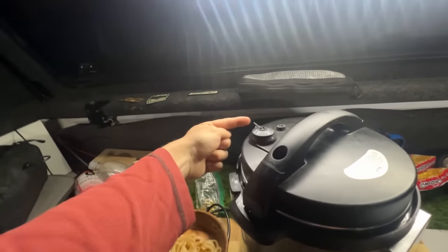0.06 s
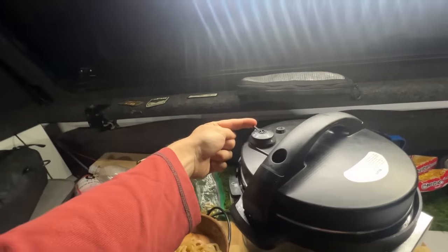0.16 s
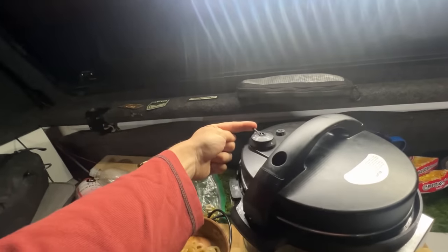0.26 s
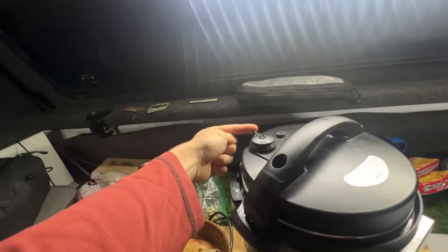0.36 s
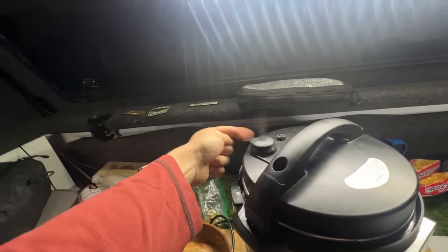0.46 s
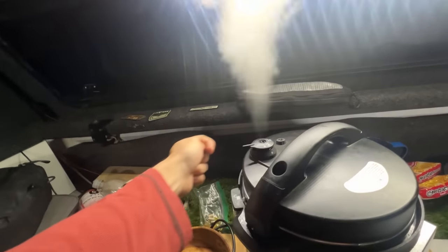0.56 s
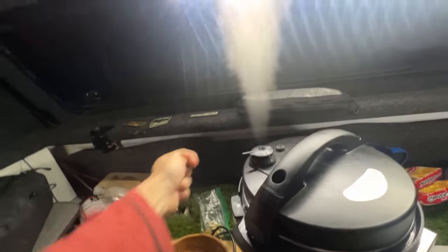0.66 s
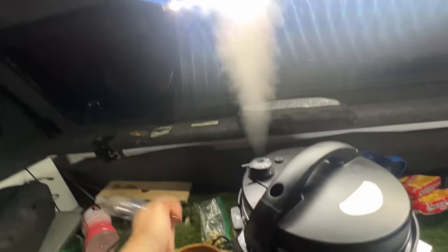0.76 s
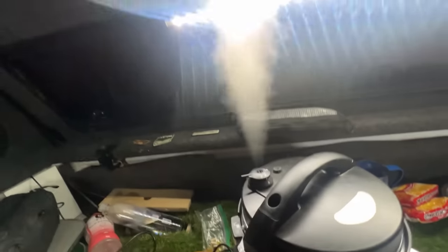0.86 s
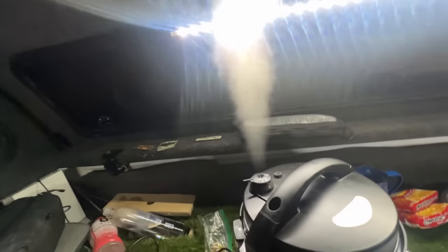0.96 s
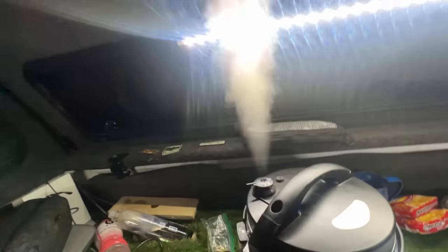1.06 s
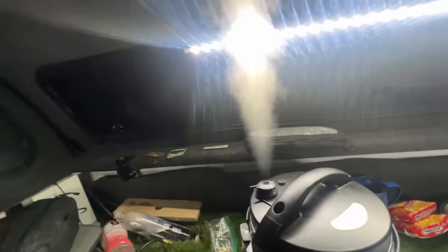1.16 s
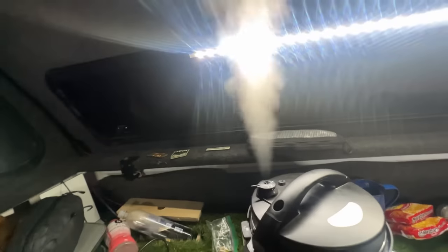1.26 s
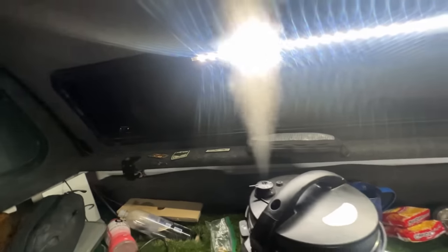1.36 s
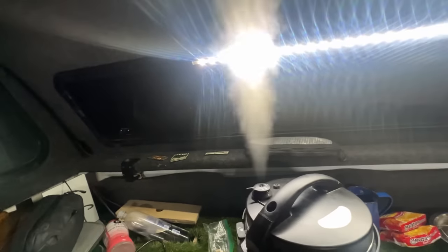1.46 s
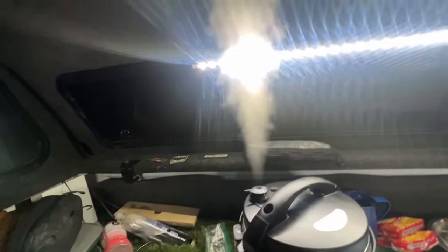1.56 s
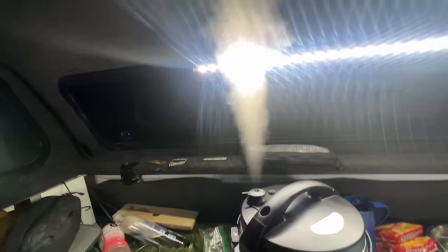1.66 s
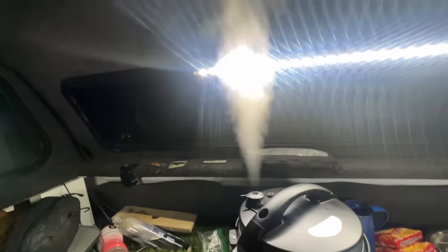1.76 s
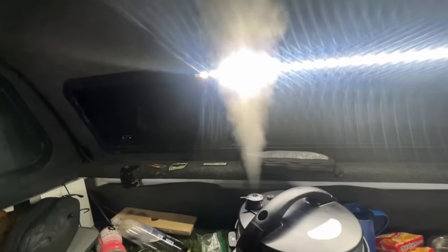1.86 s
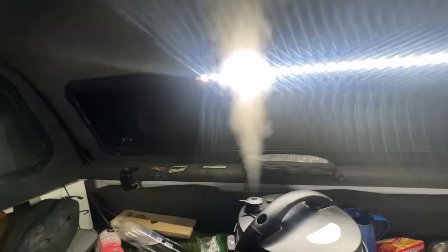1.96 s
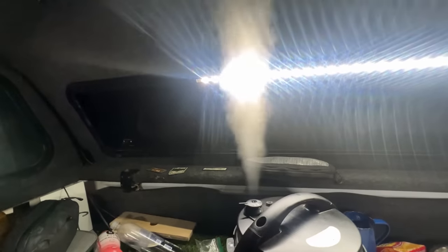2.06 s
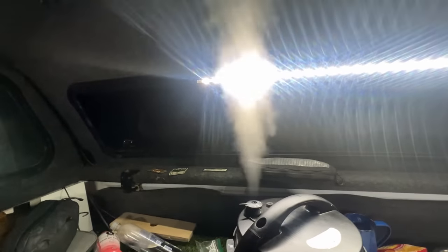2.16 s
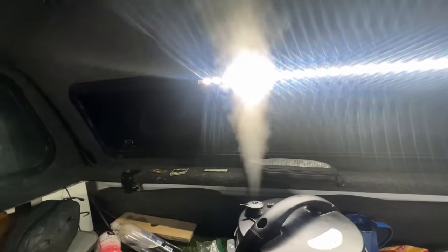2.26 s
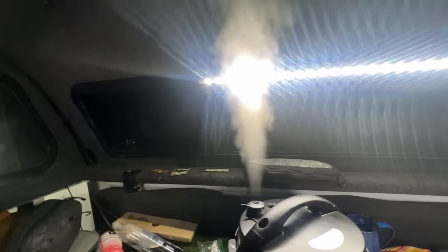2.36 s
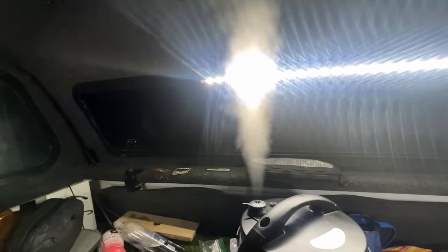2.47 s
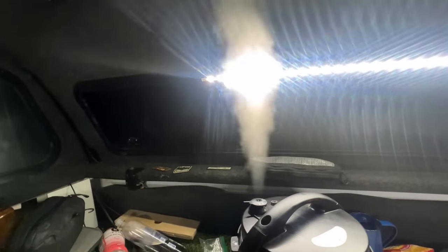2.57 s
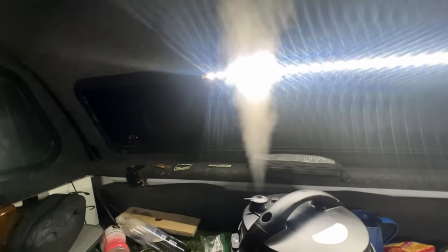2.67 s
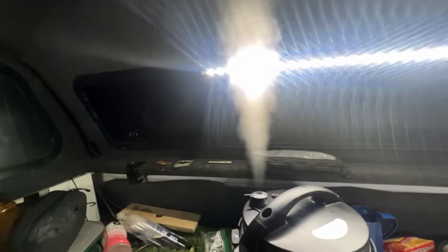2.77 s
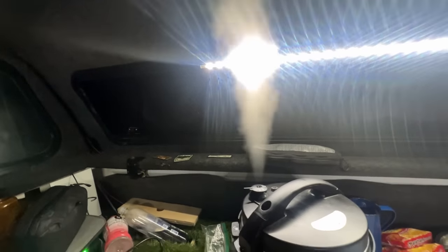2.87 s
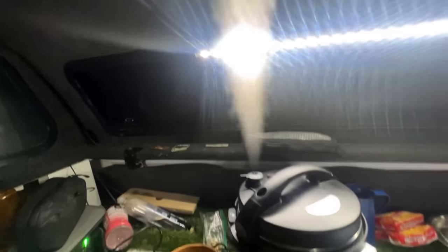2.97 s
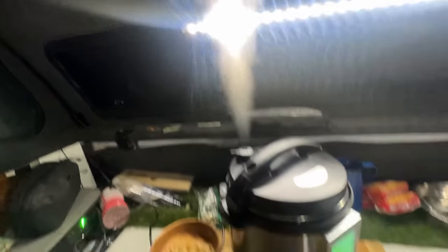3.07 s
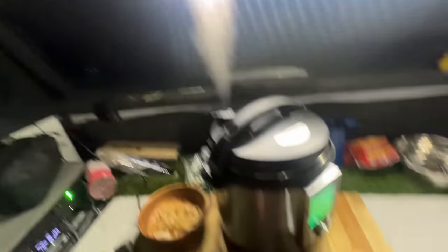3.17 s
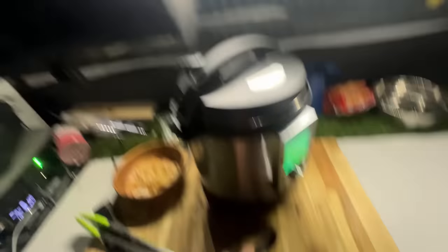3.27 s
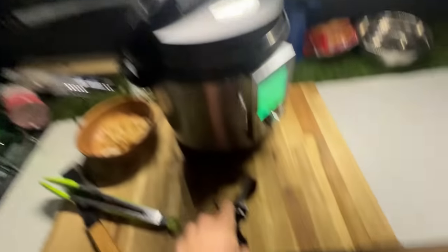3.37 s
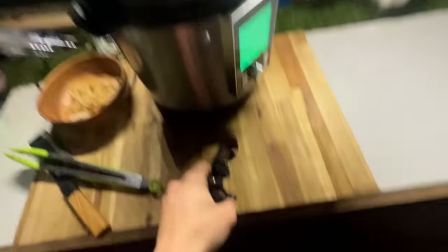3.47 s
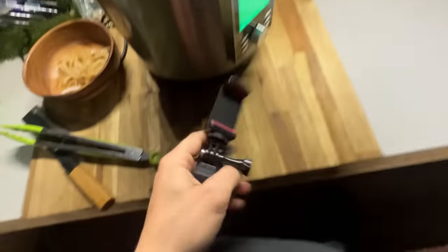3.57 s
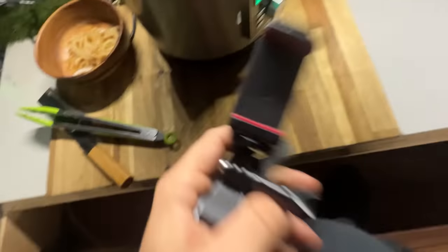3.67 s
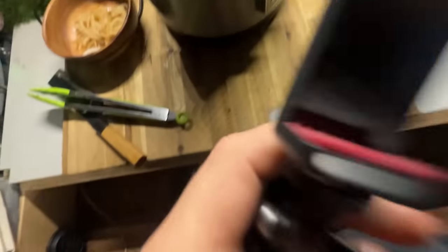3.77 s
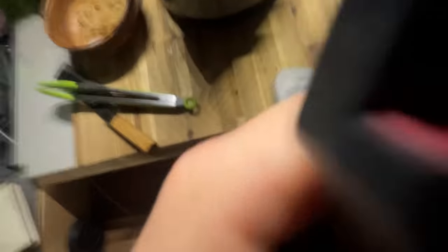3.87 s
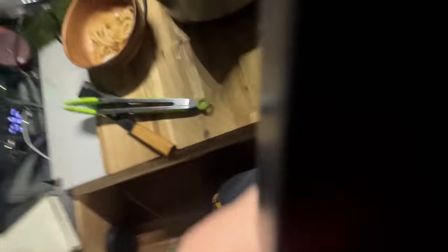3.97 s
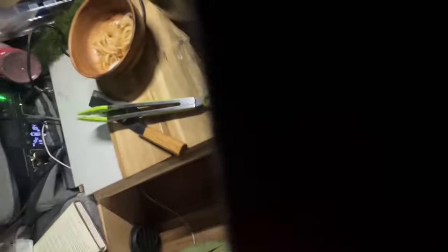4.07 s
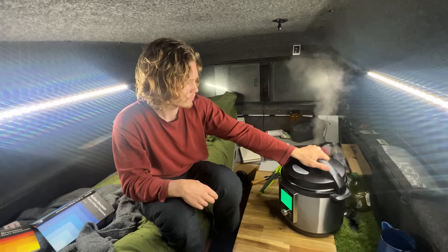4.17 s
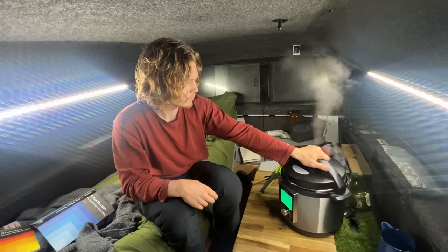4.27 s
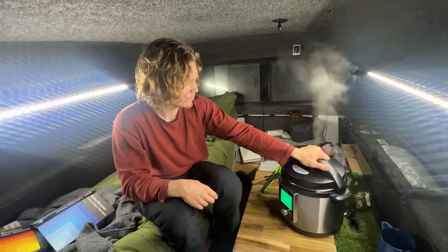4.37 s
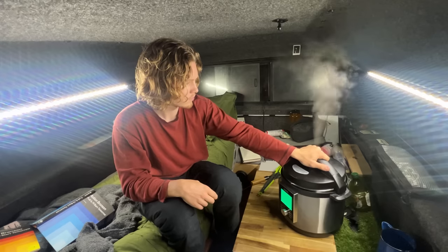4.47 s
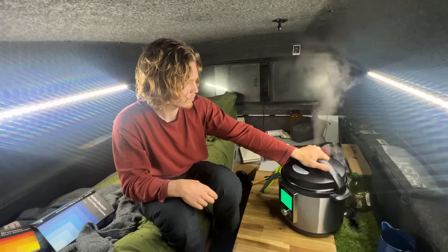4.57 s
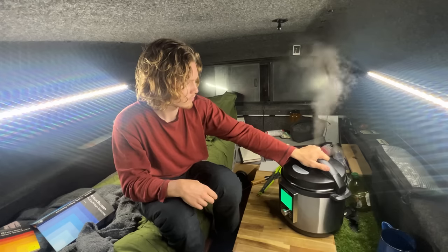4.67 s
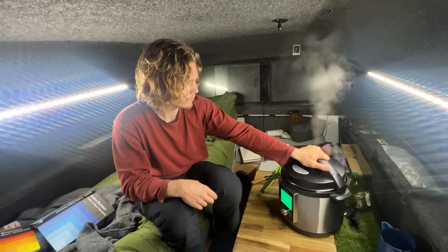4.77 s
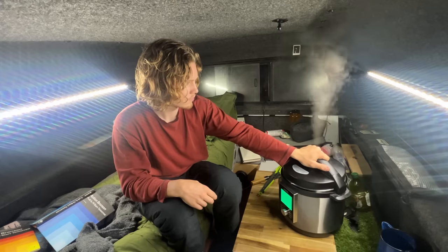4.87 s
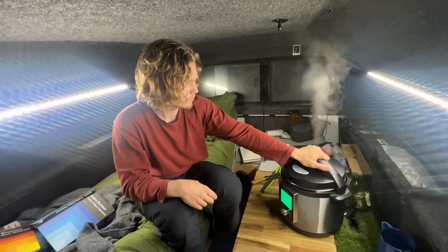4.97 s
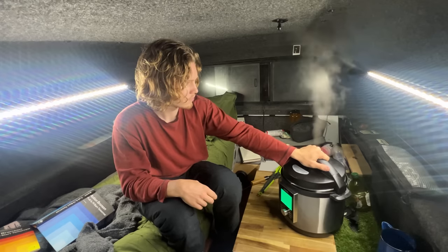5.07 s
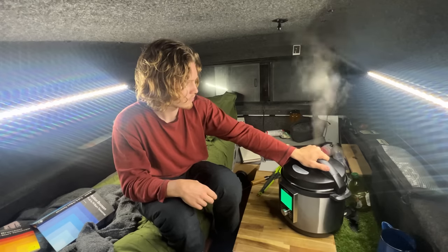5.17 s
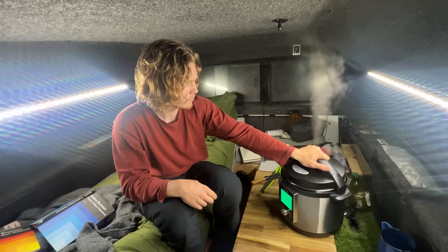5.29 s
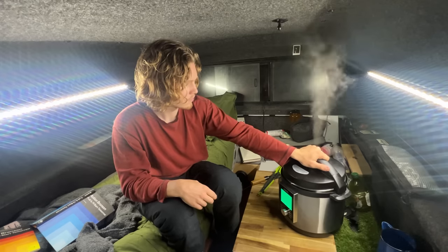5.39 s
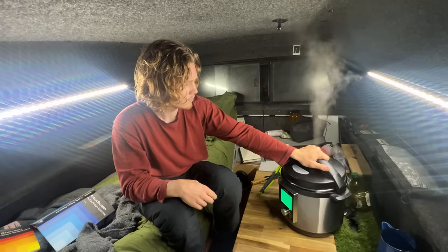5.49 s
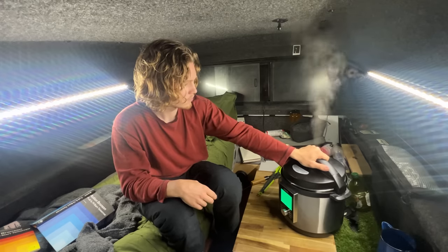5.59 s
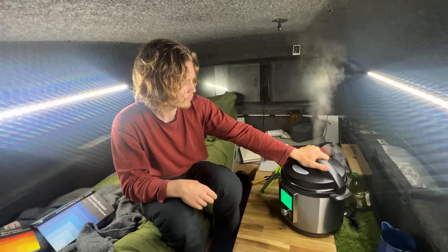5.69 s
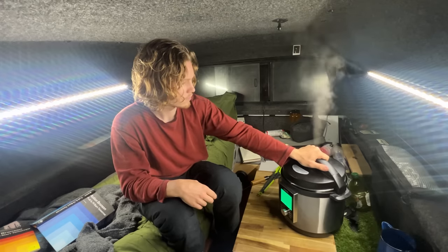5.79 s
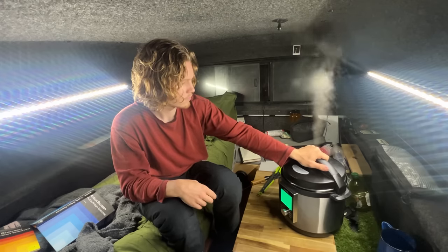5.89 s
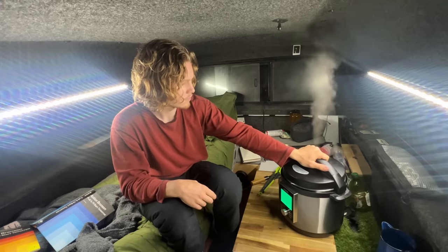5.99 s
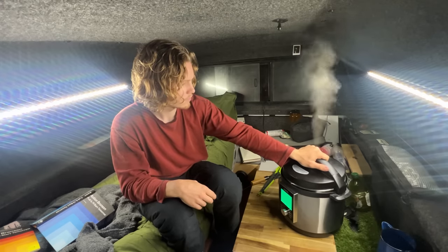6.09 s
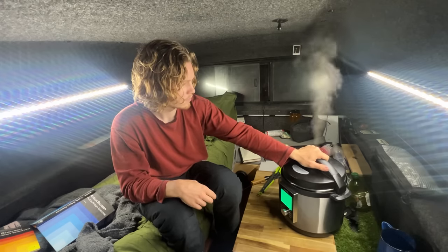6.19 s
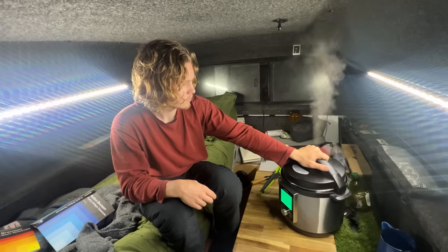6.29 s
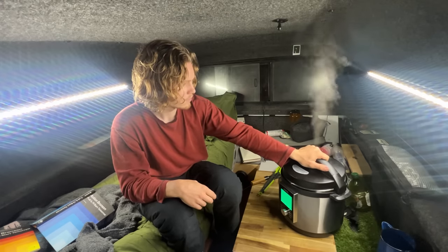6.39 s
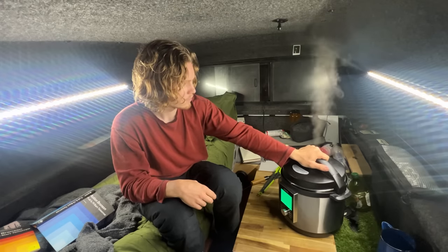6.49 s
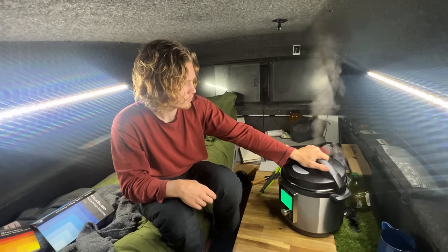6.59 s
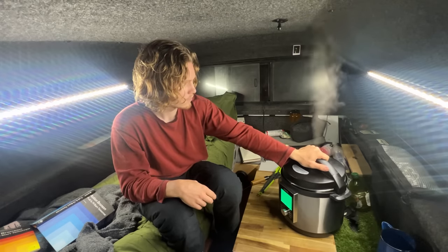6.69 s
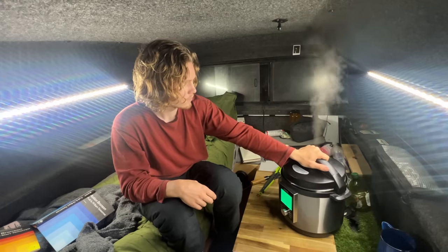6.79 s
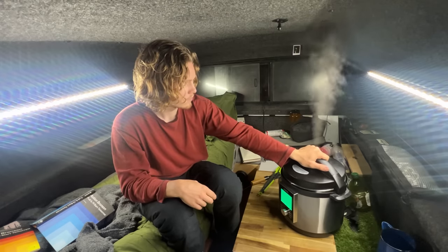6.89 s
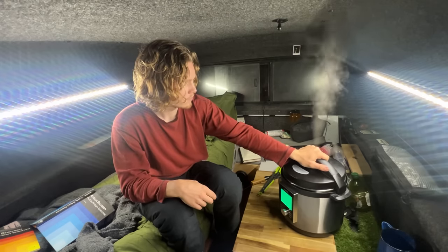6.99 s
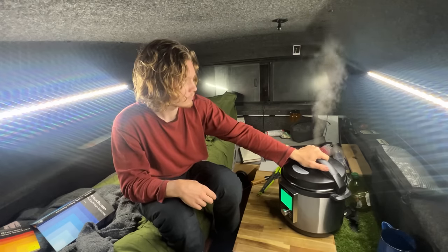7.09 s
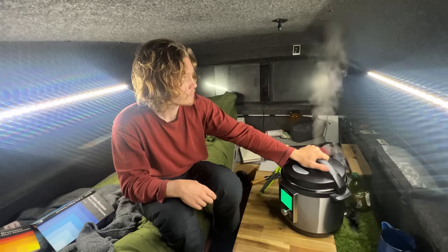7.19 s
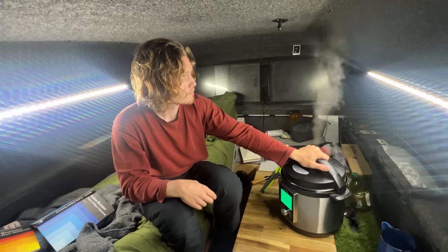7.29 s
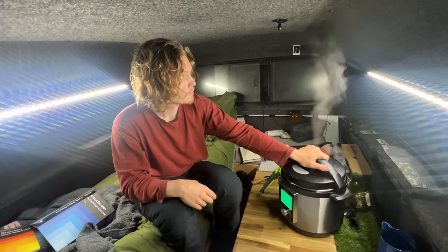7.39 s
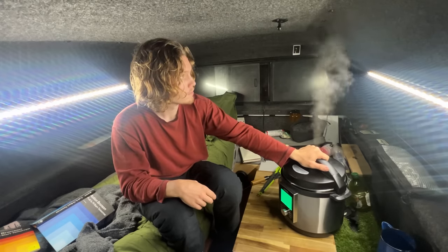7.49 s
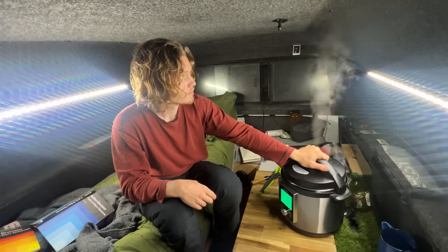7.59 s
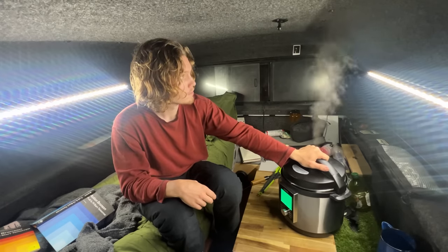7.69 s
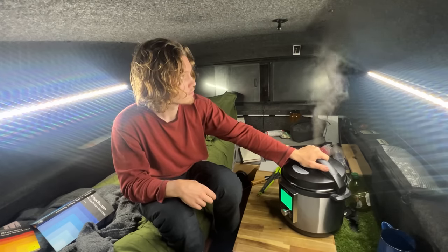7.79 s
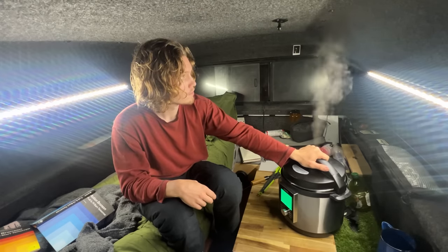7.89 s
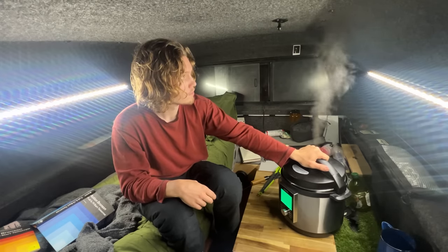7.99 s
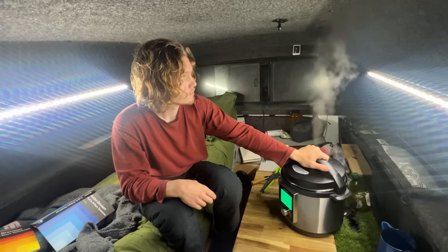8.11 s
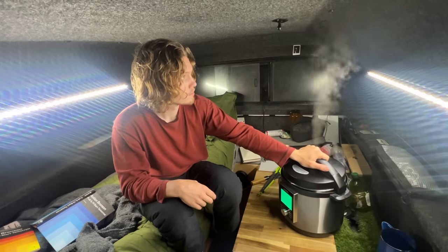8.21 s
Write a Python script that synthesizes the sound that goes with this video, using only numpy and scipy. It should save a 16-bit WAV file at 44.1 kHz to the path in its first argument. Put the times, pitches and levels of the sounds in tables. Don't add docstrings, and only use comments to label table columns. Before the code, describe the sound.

A low hum in a small camper, then a valve knocks open and steam blasts out in a loud close hiss, later clicking away to a distance.

```python
import sys
import numpy as np
from scipy import signal
from scipy.fft import rfft, irfft, next_fast_len
from scipy.io import wavfile
from scipy.ndimage import map_coordinates

SR = 44100
rng = np.random.default_rng(int(sys.argv[2]) if len(sys.argv) > 2 else 0)


def field_ratio(decibels):
    return 10 ** (np.asarray(decibels, dtype=float) / 20)


def wav_out(sig):
    wavfile.write(sys.argv[1], SR, np.round(np.clip(np.atleast_2d(sig).T, -1, 1) * 32767).astype(np.int16))


N = 363825

# (time [s], share of the far colour [0-1],
# first frequency where the ports cancel [Hz, sign: which port leads], unshared part of the valley [0-1])
POSITIONS = [(.46, 0, -3600, .5), (.68, 0, -3600, .33), (.95, 0, -3800, .6), (1.12, 0, -4100, .7),
             (1.3, 0, -3700, .8), (2.85, 0, -3950, .5), (3.13, .15, -3750, .4), (3.24, .4, -3200, .02),
             (3.335, .5, -2700, .02), (3.44, .55, -2100, .7), (3.58, .5, -2300, .9), (3.72, .6, -2500, .9),
             (3.9, .7, 2300, .9), (4.15, .75, 2300, .9), (4.4, .85, 2200, .9), (4.62, 1, 2300, .75)]


def unit(x):
    return x / np.sqrt(np.mean(x ** 2) + 1e-20)


def along(points, hz):
    f, *cols = np.transpose(points)
    return np.array([np.interp(np.log(hz + 1), np.log(f + 1), c) for c in cols])


def curves(rows):
    s, *cols = np.transpose(rows)
    return np.array([np.interp(np.arange(N) / SR, s, c) for c in cols])


def wobble(rate):
    knots = rng.standard_normal(int(N * rate / SR) + 4)
    return map_coordinates(knots, [np.arange(N) * rate / SR])


def noise(gain, alike, size=N):
    m = next_fast_len(size)
    spectra = rfft(rng.standard_normal((2, m))) * gain(np.fft.rfftfreq(m, 1 / SR))
    mid, side = irfft(spectra, m)[:, :size]
    turn = np.arccos(np.clip(alike, -1, 1)) / 2
    return unit(np.cos(turn) * mid + np.sin(turn) * side * np.array([[1], [-1]]))


def peak(hz, centre_hz, width_hz):
    return 1j * hz * width_hz / (centre_hz ** 2 - hz ** 2 + 1j * hz * width_hz)


def hum():
    # (frequency [Hz], density [dB per Hz])
    rumble_colour = [(12, -56), (20, -19), (43, -23), (81, 0), (150, -1.5), (200, -58), (330, -120)]
    # (frequency [Hz], density [dB per Hz])
    air_colour = [(120, -16), (200, -1.5), (243, -22.5), (286, -6.5), (345, -13.5), (377, -17), (464, -17),
                  (545, -29), (754, -27.5), (812, -25.5), (1000, -24.5), (1300, -48), (2200, -120)]
    # (frequency [Hz], density [dB per Hz])
    quiet_colour = [(500, 3), (900, -9), (1180, -5), (1265, 2.5), (1360, -7), (1900, -4), (2400, -16),
                    (3700, -22), (6800, -21), (7550, -11.5), (8200, -22), (9800, -30), (11000, -64),
                    (14000, -120)]
    # (time [s], gain [dB])
    gain_points = [(0, -9.5), (.5, -6.5), (1.3, -10), (1.75, -17), (2.15, -26), (2.6, -19), (3.06, -16),
                   (3.3, -29), (3.7, -24.5), (3.92, -5), (4.5, 0), (8.25, 0)]
    gain_db, = curves(gain_points)
    rumble = noise(lambda hz: field_ratio(along(rumble_colour, hz)), alike=0.98)
    tone = noise(lambda hz: peak(hz, 174.2, 12.7) * peak(hz, 168.0, 92), alike=0.9)
    air = noise(lambda hz: field_ratio(along(air_colour, hz)), alike=0.63)
    quiet = noise(lambda hz: field_ratio(along(quiet_colour, hz)), alike=0.022)
    out = field_ratio(-39 + 1.41 * gain_db) * rumble
    out += field_ratio(-40.5 + 0.77 * gain_db) * tone
    out += field_ratio(-45.5 + 0.82 * gain_db) * air
    out += field_ratio(-72.5 + 16.5 + 0.35 * gain_db) * quiet
    return out


def finger_rubs():
    # (start [s], end [s], level [dB], centre [Hz], fade [dB])
    scrapes = [
        (.234, .3, -68, 2800, 10),
        (.43, .456, -47, 900, -4),
        (.452, .55, -24.5, 950, 22),
    ]
    # (start [s], end [s], level [dB], centre [Hz], fade [dB])
    grips = [
        (3.09, 3.28, -62, 80, 0),
        (3.1, 3.25, -62, 330, 0),
        (4.03, 4.075, -50, 520, -3),
        (.455, .53, -42, 230, 8),
        (3.08, 3.22, -60, 750, 0),
        (3.27, 3.31, -60, 300, 0),
        (3.972, 4.064, -41.5, 1350, -2),
        (3.97, 4.0, -46, 480, 6),
        (4.3, 4.36, -39, 250, 4),
        (4.45, 4.49, -51, 560, 4),
    ]
    out, t = np.zeros((2, N + SR)), np.arange(SR // 5) / SR
    for rows, wide in ((scrapes, 0.84), (grips, 0.5)):
        for s, end, db, centre_hz, fade_db in rows:
            stroke = np.clip(np.minimum(t / .003, (end - s - t) / .008), 0, 1)
            stroke = stroke * field_ratio(db - fade_db * t / (end - s))
            rub = noise(lambda hz: peak(hz, centre_hz, wide * centre_hz) ** 2, alike=0.21, size=len(t))
            flutter = field_ratio(5.1 * wobble(237)[:len(t)])
            out[:, round(s * SR):][:, :len(t)] += stroke * rub * flutter
    return out[:, :N]


def jet_levels():
    # (time [s], main hiss [dB], left-right difference [dB])
    flow = [(.47, -21, 3), (.84, -22, .5), (1.25, -24, 1), (2.13, -27, 5), (3.0, -27.5, 2), (3.2, -26.5, 9),
            (3.34, -27, 5), (3.44, -27.5, 7.5), (3.6, -26.5, 9.5), (3.87, -27, 5.5), (3.89, -30.5, 7),
            (3.95, -34, 11), (4.07, -37, 10), (4.2, -33.5, 14), (4.35, -35, 12), (4.66, -39, 17),
            (6.4, -41, 16.5), (8.25, -43.5, 17.5)]
    main_db, pan_db = curves(flow)
    far, = curves([position[:2] for position in POSITIONS])
    burst_db = 4.5 * np.exp(-np.abs(np.arange(N) / SR - POSITIONS[0][0]) / 0.29)
    roar_db = -15.5 + burst_db + 1 * far
    valley_db = -19.5 + burst_db
    top_db = -11 - 6 * np.clip(far / 0.65, 0, 1)
    return [main_db + db for db in (roar_db, valley_db, 0, top_db)], pan_db


def walls(hz, size, left_echoes, alike, tail_db, t60):
    drawn = rng.uniform([1.3, -25], [8, -17], (2, 14, 2))
    ports = [drawn[0] if left_echoes is None else left_echoes, drawn[1]]
    echoes = np.array([sum(field_ratio(db) * np.exp(-2j * np.pi * hz * ms / 1000) for ms, db in port)
                       for port in ports])
    t = np.arange(SR // 8) / SR
    tail = rng.standard_normal((2, len(t))) * field_ratio(-60 * t / t60) * (t > .005)
    echoes += field_ratio(tail_db) * rfft(tail / np.linalg.norm(tail[0]), size)
    echoes[1] += alike / (1 + (hz / 4500) ** 8) * (echoes[0] - echoes[1])
    fade = 1 / (1 + (hz / 9800) ** 30)
    hardness_db = 2
    return np.exp(field_ratio(hardness_db) * fade * echoes)


def jet_colour(hz, far):
    # (frequency [Hz], left [dB], right [dB])
    close_colour = [(520, -24.5, -32.5), (1057, -14.5, -16), (1530, -13, -9), (2030, -11, -10.5),
                    (3240, -12, -12), (3700, -11.5, -10.5), (5440, -5.5, -12), (5640, -4.5, -11),
                    (8140, -3, -4.5), (8690, -6.5, 0), (9100, -5.5, -10), (10400, -3.5, -0.5),
                    (12200, -8, -10.5), (15500, -9.5, -8)]
    # (frequency [Hz], left [dB], right [dB])
    far_colour = [(500, -24, -26), (1000, -17, -21), (1430, -17, -24), (2100, -23, -27), (3900, -23, -30),
                  (5300, -10, -20), (6000, -1, -19), (7000, -3, -20), (7900, -8.5, -21), (8500, -18, -22),
                  (9300, -23, -22), (10300, -27.5, -27.5), (11000, -33, -33), (12900, -20, -20),
                  (13600, -20, -20), (14300, -45, -45), (15000, -41, -41)]
    share = np.where((hz > 4300) & (hz < 9600), far, far ** 6)
    return field_ratio((1.5 - share) * along(close_colour, hz) + share * along(far_colour, hz))


def jet_at_ports(hz, size, far, cancel_hz, unshared, on_stand):
    # (frequency [Hz], width [Hz], level [dB], sign and size at the right port)
    held_modes = [(1424, 560, -1.5, 0.16), (1566, 56, 17.5, -0.42), (1684, 174, 4.5, 0.38),
                  (1982, 26, 10.5, -0.47), (2373, 42, -2, 0.73)]
    # (frequency [Hz], width [Hz], level [dB], sign and size at the right port)
    stand_modes = [(758, 86, 4.4, 0.49), (1068, 99, 1.8, 0.11), (1428, 220, 5.4, 0.11),
                   (1664, 86, 0.67, 0.29), (5340, 7.7, 1.2, 0.74)]
    together_hz = 12050 + far ** 5 * (12150 - 12050)
    turn_hz = 3450 + far ** 5 * (3350 - 3450)
    top = 2 * np.pi * (hz - together_hz) / turn_hz
    top -= (.2 + .2 * far) * np.sin(2 * top)
    low = np.pi * hz / cancel_hz
    low -= .85 * np.sin(low)
    apart = np.where(hz < 9600, low, top)
    common, *own = rfft(rng.standard_normal((3, size)))
    stray = np.interp(hz, [1500, 2500, 4200, 5000, 9000, 9800],
                      [.4, unshared, unshared, .5 + far * unshared, .4 + far * unshared, 0])
    ports = np.exp(.5j * apart * np.array([[-1], [1]])) * common + stray * np.array(own)
    for centre_hz, width_hz, db, sign in stand_modes if on_stand else held_modes:
        ring = field_ratio(db) * peak(hz, centre_hz, 1.49 * width_hz) ** 2 * common
        ports = ports + ring * np.array([[1], [sign]])
    return ports


def jet():
    # (low edge [Hz], high edge [Hz])
    band_edges = [
        (350, 2200),
        (2200, 4300),
        (4300, 9600),
        (9600, 15800),
    ]
    # (delay [ms], level [dB])
    held_walls = [(1.284, -23.0), (1.348, -19.5), (1.424, -19.4), (1.58, -19.6), (1.696, -23.9),
                  (2.916, -22.6), (3.068, -20.6), (3.656, -24.1), (3.868, -24.3), (4.632, -22.0),
                  (5.4, -24.4), (7.528, -22.4), (7.736, -24.5), (9.344, -25.0)]
    # (delay [ms], level [dB])
    stand_walls = [(1.364, -15.8), (1.704, -19.1), (2.792, -20.4), (2.976, -17.4), (3.492, -19.7),
                   (3.556, -17.3), (3.856, -19.1), (4.132, -21.4), (4.336, -18.0), (4.512, -22.2),
                   (4.676, -21.4), (4.856, -23.0), (5.12, -20.7), (5.528, -22.2)]
    known_walls = {4: held_walls, len(POSITIONS) - 1: stand_walls}
    levels_db, pan_db = jet_levels()
    blend = SR // 11
    starts = [round(position[0] * SR) - blend // 2 for position in POSITIONS] + [N]
    bands = np.zeros((4, 2, N + blend))
    for k, (s, far, cancel_hz, unshared) in enumerate(POSITIONS):
        length = starts[k + 1] - starts[k] + blend
        size = next_fast_len(max(length, SR // 8))
        hz = np.fft.rfftfreq(size, 1 / SR)
        on_stand = s >= POSITIONS[-4][0]
        ports = jet_at_ports(hz, size, far, cancel_hz, unshared, on_stand)
        room = walls(hz, size, known_walls.get(k), .9 - unshared, tail_db=-9, t60=0.15)
        heard = jet_colour(hz, far) * room * ports
        place = np.arange(length)
        rise = place if k else blend
        ramp = np.sin(np.pi / 2 * np.clip(np.minimum(rise, length - place) / blend, 0, 1))
        for i, (lo, hi) in enumerate(band_edges):
            part = irfft(heard * (hz >= lo) * (hz < hi), size)[:, :length]
            if i == 2:
                part /= part.std(axis=1, keepdims=True)
            bands[i][:, starts[k]:][:, :length] += ramp * part / part.mean(axis=0).std()
    bands = bands[:, :, :N]
    bands[2] *= field_ratio(pan_db * np.array([[.5], [-.5]])) / np.sqrt(np.cosh(pan_db * np.log(10) / 20))
    surge_db = 0.047 * wobble(8.3) + 0.2 * wobble(30) + 0.64 * wobble(90)
    opening_db = curves([(.4505, -90), (.452, -23), (.462, -18), (.465, 0)])[0]
    return field_ratio(surge_db + opening_db) * sum(field_ratio(db) * band for db, band in zip(levels_db, bands))


def strike_rise(t):
    return 1 - np.exp(-(t / 0.00038) ** 2)


def valve_cap():
    # (frequency [Hz], level [dB], t60 [s])
    cap_modes = [(375, -31, 0.11), (580, -27, 0.22), (1005, -25, 0.037)]
    out, t = np.zeros((2, N)), np.arange(SR // 5) / SR
    cap = sum(field_ratio(db - 60 * t / t60) * np.sin(2 * np.pi * hz * t) for hz, db, t60 in cap_modes)
    out[:, round(.456 * SR):][:, :len(t)] += strike_rise(t) * cap
    return out


def stand_clicks():
    # (time [s], peak [dB], ring [Hz], ring t60 [s], thud [dB])
    contacts = [
        (3.88, -9.5, 1280, 0.004, -19),
        (3.885, -20, 1770, 0.01, -10.5),
        (3.926, -37, 1730, 0.012, -4),
        (3.954, -11, 1490, 0.0066, -22),
        (4.014, -45, 1410, 0.015, -16),
        (4.057, -28, 1340, 0.01, -17),
        (4.315, -20, 1500, 0.01, -12),
        (4.336, -31, 1050, 0.025, -4),
        (4.395, -40, 1540, 0.0096, -2),
    ]
    out, t = np.zeros((2, N + SR)), np.arange(SR // 5) / SR
    for s, db, hz, t60, thud_db in contacts:
        pan_db = 48.5 + .72 * db
        grit = 0.21 * rng.standard_normal(len(t)) * field_ratio(-60 * t / 0.0067)
        ring = field_ratio(-60 * t / t60) * (np.sin(2 * np.pi * hz * t) + grit)
        thud = field_ratio(thud_db - 60 * t / 0.022) * np.sin(2 * np.pi * 330 * t)
        sides = field_ratio([[pan_db / 2], [-pan_db / 2]]) / np.cosh(pan_db * np.log(10) / 40)
        out[:, round(s * SR):][:, :len(t)] += field_ratio(db + 6.5) * strike_rise(t) * (ring * sides + thud)
    return out[:, :N]


def scene():
    return hum() + finger_rubs() + jet() + valve_cap() + stand_clicks()


def band_limit(x):
    return signal.sosfilt(signal.butter(12, 15850, fs=SR, output="sos"), x)


def record(dry):
    t = np.arange(N) / SR
    duck_db = np.zeros(N)
    for s, depth_db in [(3.888, 16), (3.958, 11)]:
        duck_db -= depth_db * np.exp(-np.maximum(t - s, 0) / 0.0073) * (t > s)
    return band_limit(dry * field_ratio(duck_db))


dry = scene()
out = record(dry)
wav_out(out)
```